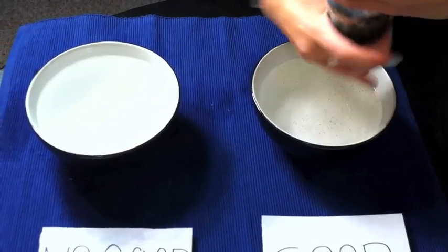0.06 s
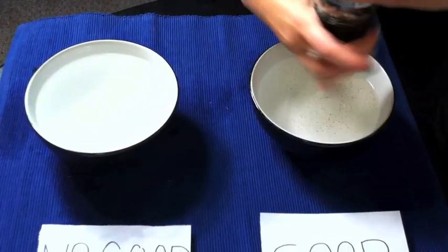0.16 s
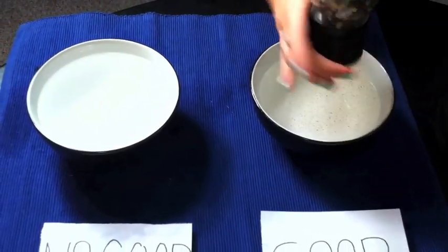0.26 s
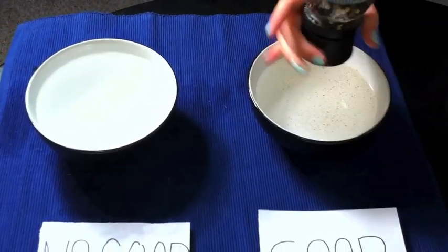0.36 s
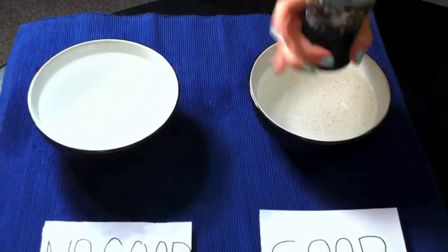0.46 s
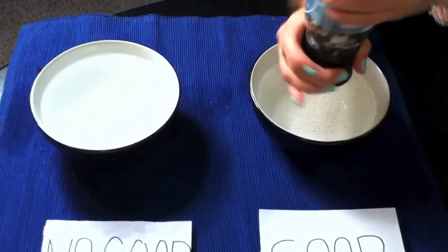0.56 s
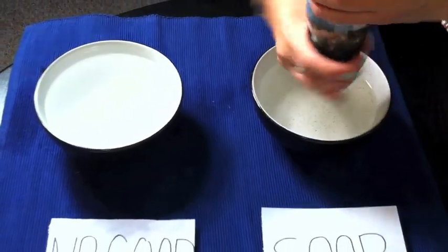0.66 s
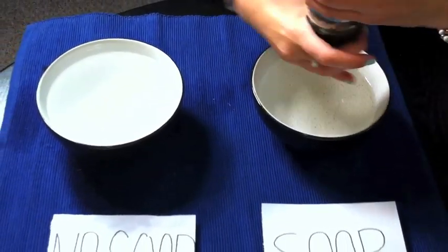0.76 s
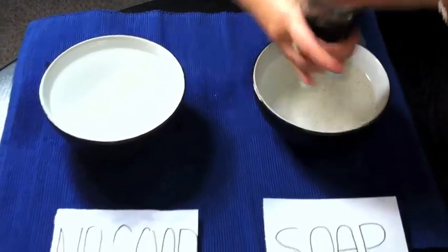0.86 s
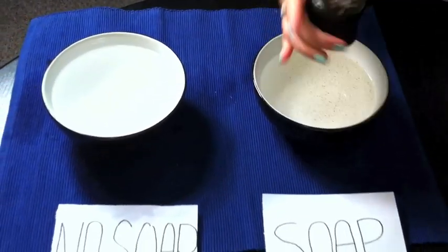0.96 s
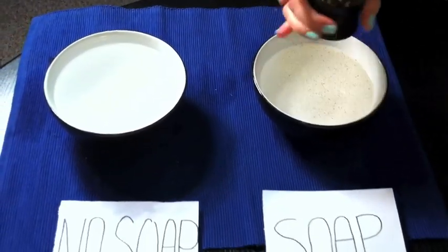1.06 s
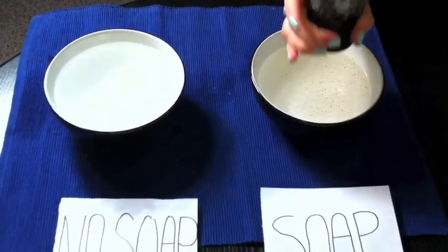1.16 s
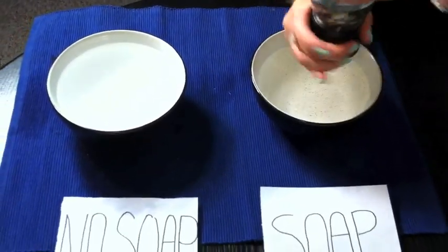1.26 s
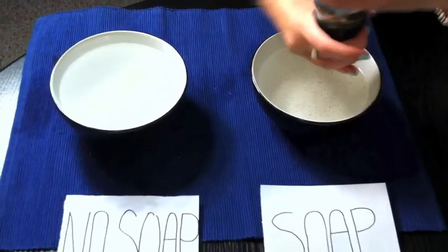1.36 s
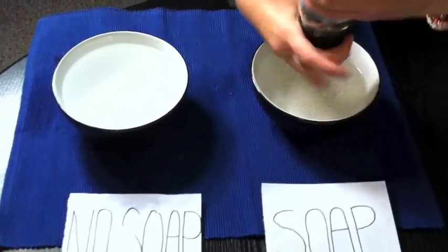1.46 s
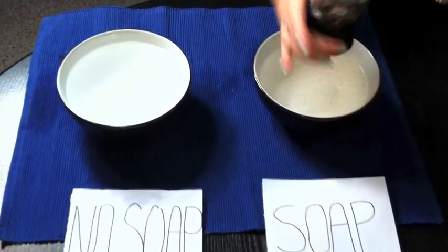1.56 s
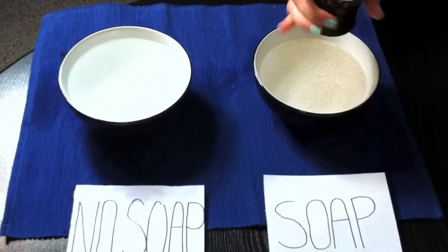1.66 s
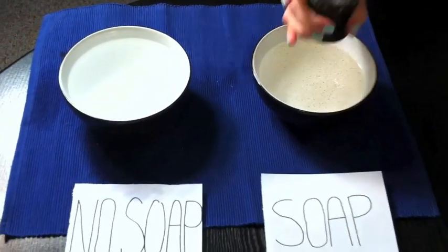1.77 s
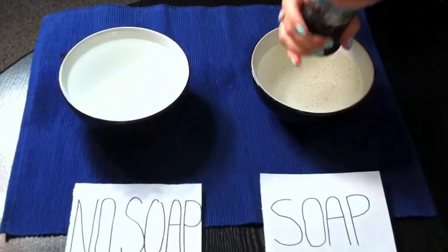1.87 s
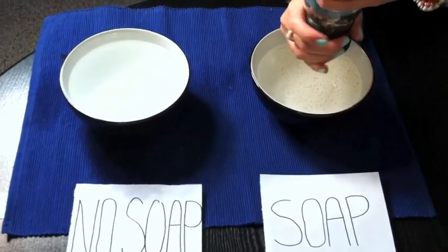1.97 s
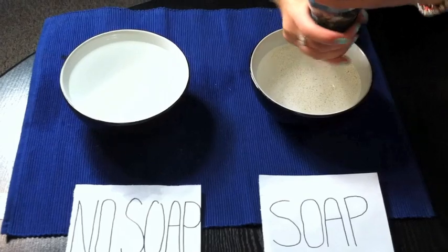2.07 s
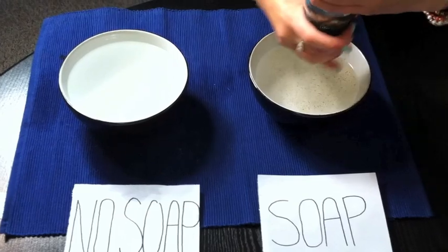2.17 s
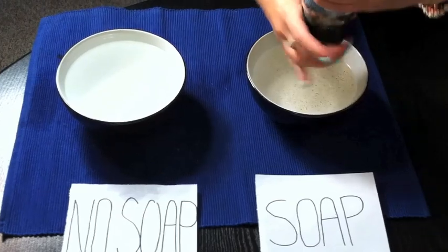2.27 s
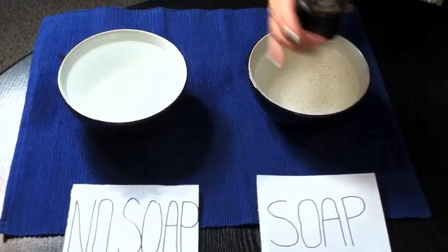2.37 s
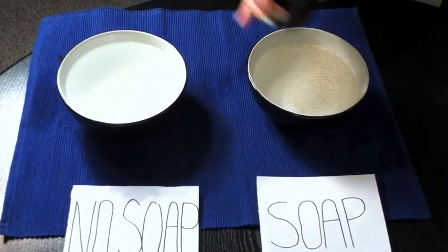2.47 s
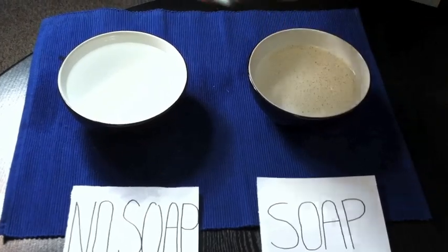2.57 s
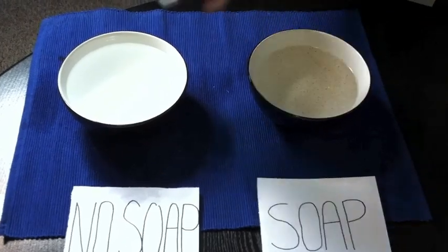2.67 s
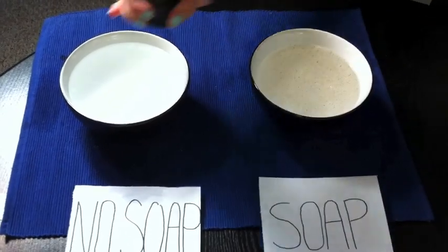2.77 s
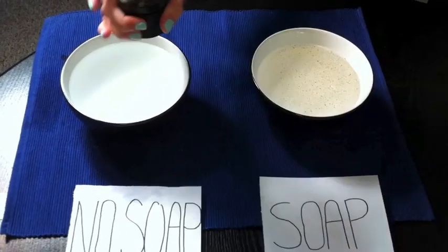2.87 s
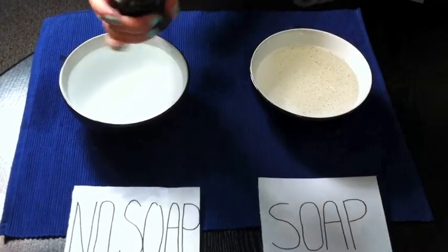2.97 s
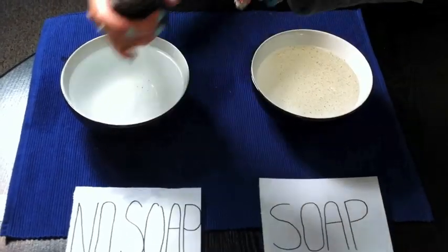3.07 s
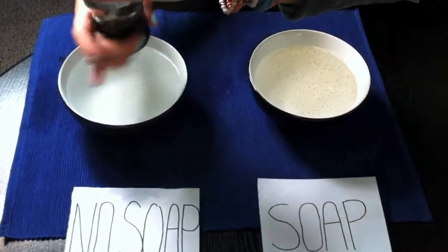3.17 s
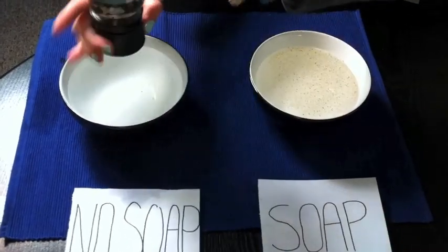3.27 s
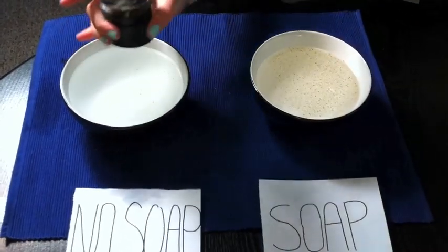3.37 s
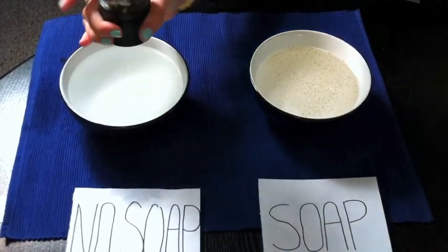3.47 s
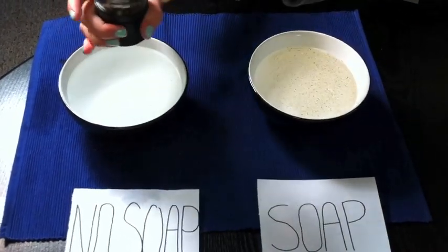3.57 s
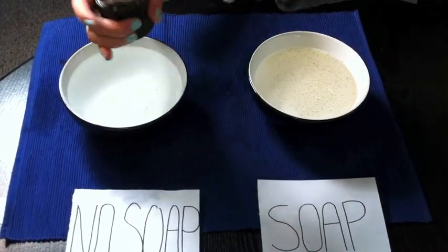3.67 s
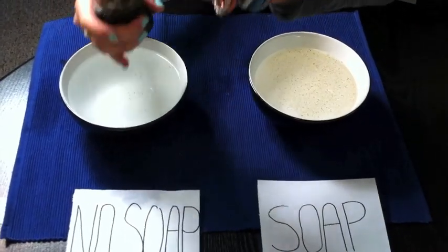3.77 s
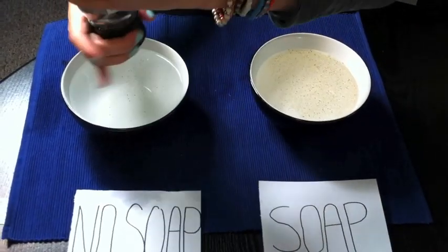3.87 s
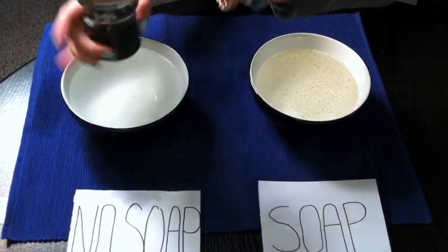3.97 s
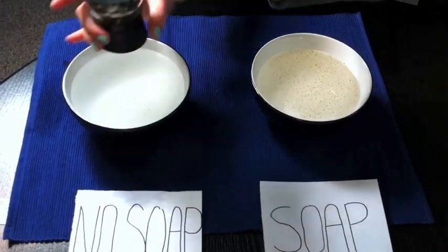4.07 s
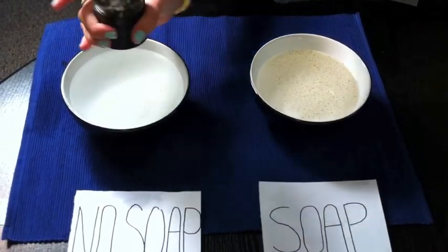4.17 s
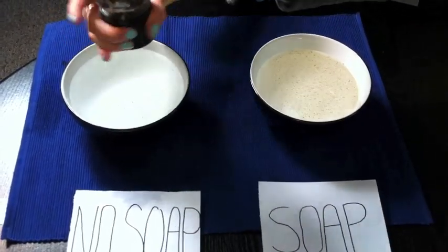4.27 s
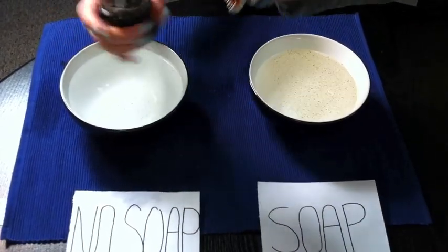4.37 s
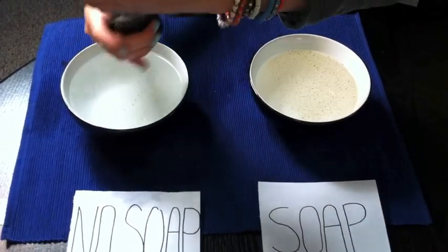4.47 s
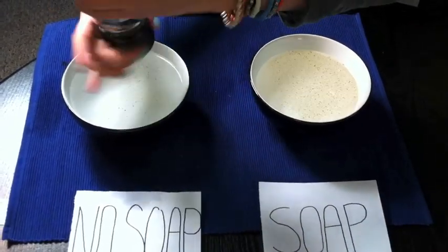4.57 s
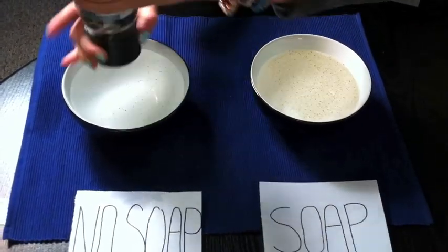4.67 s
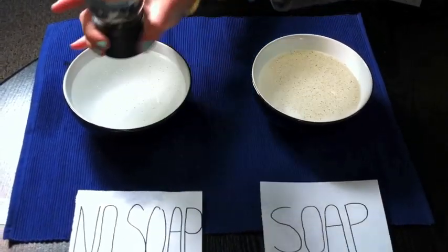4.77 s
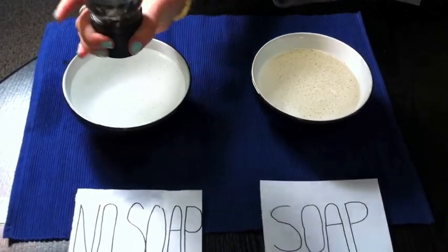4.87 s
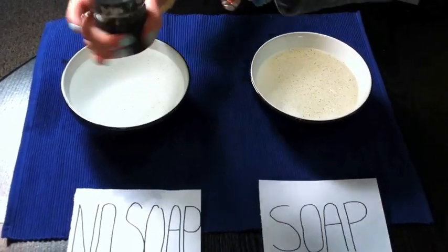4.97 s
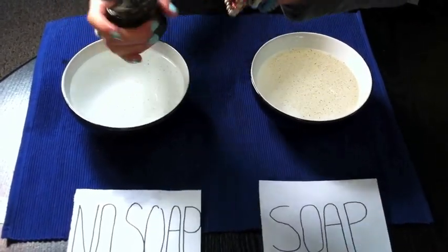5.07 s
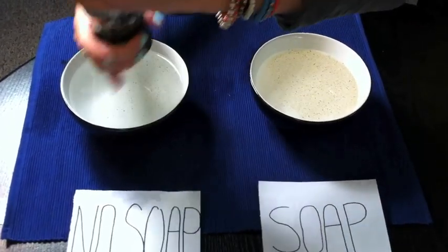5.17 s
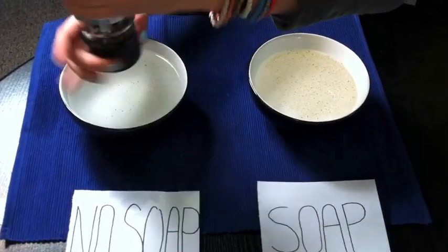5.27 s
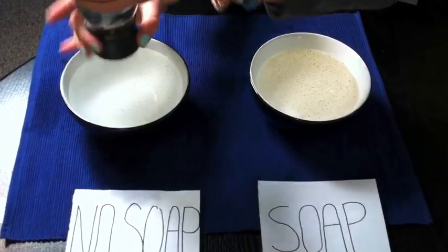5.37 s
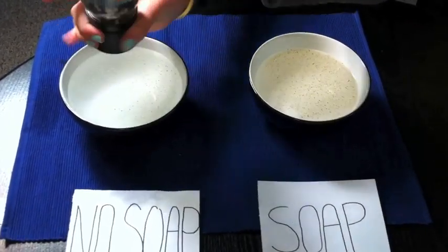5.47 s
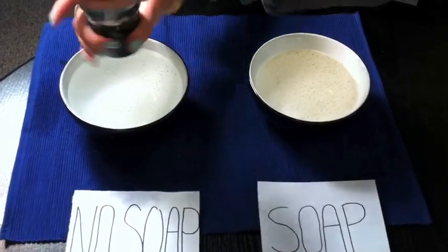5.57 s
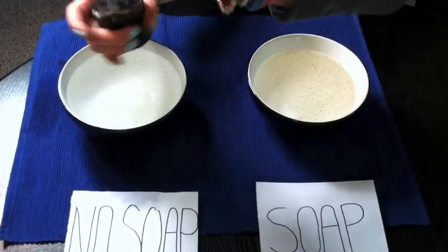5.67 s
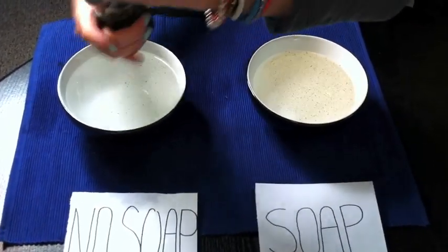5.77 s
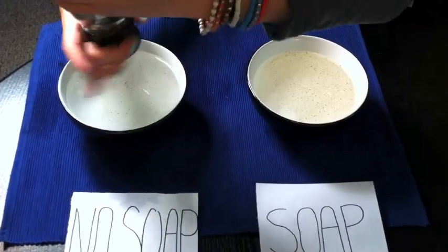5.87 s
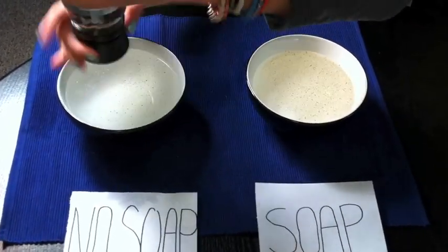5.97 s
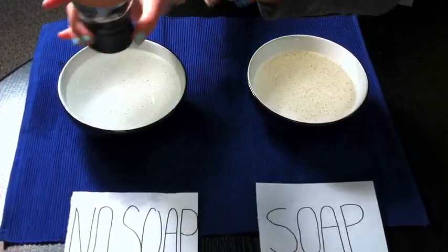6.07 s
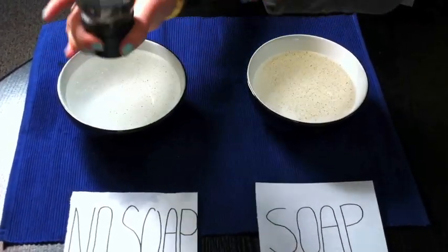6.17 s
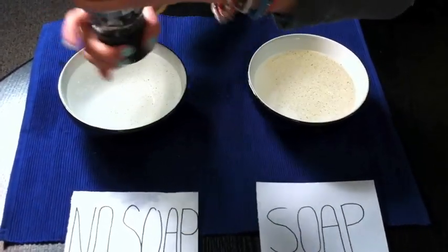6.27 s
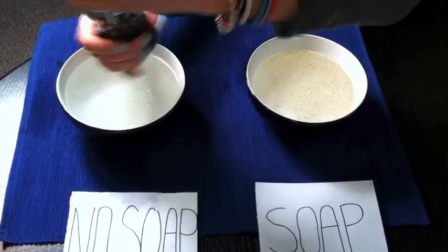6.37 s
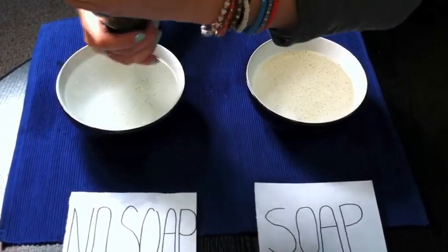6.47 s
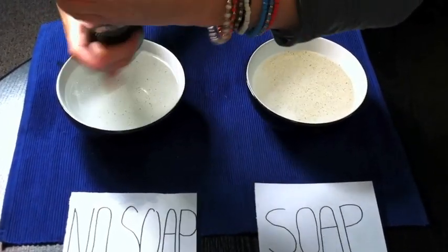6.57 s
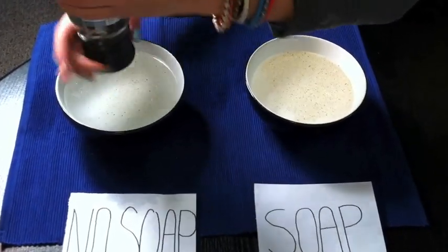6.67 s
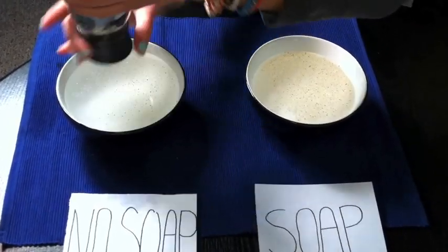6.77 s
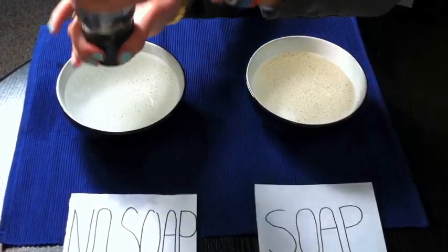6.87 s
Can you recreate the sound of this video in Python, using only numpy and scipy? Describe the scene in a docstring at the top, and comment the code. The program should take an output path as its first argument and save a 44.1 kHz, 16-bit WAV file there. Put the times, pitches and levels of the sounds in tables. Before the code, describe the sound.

A hand pepper mill grinds in short raspy twists, peppercorns cracking sharply, loose parts knocking between strokes, in a small room with a faint hum.

```python
"""Hand pepper mill in a small room

A hand pepper mill is twisted in ten short strokes over bowls on a cloth-covered table.
In each stroke the burr rasps through grit, as grains and fragments striking its resonances,
and peppercorns crack as millisecond noise bursts; between strokes the hand shifts its grip
and loose parts knock. A small room rings after every crack, and an appliance hums faintly."""
import sys
import numpy as np
from scipy import signal
from scipy.fft import rfft, irfft, next_fast_len
from scipy.io import wavfile

SR = 44100
rng = np.random.default_rng(int(sys.argv[2]) if len(sys.argv) > 2 else 0)


def digitize_waveform(pressure):
    """Quantize a signal to 16-bit integers and store it at the path in sys.argv[1].

    Rows of a 2-D input are taken as channels; values are limited to [-1, 1].
    """
    field = np.atleast_2d(pressure).T
    bounded = np.clip(field, -1, 1)
    quanta = np.round(bounded * 32767).astype(np.int16)
    wavfile.write(sys.argv[1], SR, quanta)


N = 305613
TIME = np.arange(N) / SR

# twists of the hand, two of them with a short pause midway, so two rows each; level ahead of source gains:
# start_s, length_s, rasp_level_db, load_take_up_s
STROKES = [(-.02, 0.12, -38, 0.0098), (0.546, 0.1, -44.5, 0.027), (0.668, 0.086, -39.5, 0.035),
           (1.199, 0.18, -37.5, 0.062), (1.966, 0.17, -45, 0.025), (2.798, 0.28, -45.5, .13),
           (3.562, 0.23, -42.5, 0.081), (4.232, 0.25, -47, 0.024), (4.909, 0.19, -42.5, 0.055),
           (5.603, 0.21, -43, 0.035), (6.227, 0.099, -41.5, .03), (6.428, 0.1, -47, 0.028)]
LET_GO_S = 0.025  # decay time of the force after a twist
# resonances of the burr and its housing: centre_hz, width_hz, lift_db
MILL_MODES = [(1548, 280, 8), (2150, 140, 5.5), (2500, 190, 4.5), (2950, 59, 9), (5440, 170, 7.5),
              (6200, 460, 4.5), (8090, 510, 4)]
# resonances of the loose parts: centre_hz, width_hz, lift_db
LOOSE_MODES = [(1080, 100, 5), (1531, 160, 5.5), (2244, 230, 4.5), (3064, 230, 8), (5840, 420, 2),
               (7350, 160, 4), (14000, 900, 8.5)]
# relative spectrum of loose parts in contact: frequency_hz, density_db_per_hz
KNOCK_COLOUR = [(40, -16), (300, -9), (800, -2.5), (1150, 4), (1900, 4.5), (2900, -0.5), (3700, -10.5),
                (4700, -9), (6000, 0.5), (8500, -4.5), (10500, -11), (14500, -14)]
# relative spectrum of the rasping teeth: frequency_hz, density_db_per_hz
RASP_COLOUR = [(40, -23), (300, -19.5), (800, -16), (1150, -12), (1800, -6.5), (2700, -3.5), (3700, -3.5),
               (5600, -4.5), (8000, -8), (10500, -11), (13000, -8.5), (15500, -16.5)]


def from_db(db):
    """Amplitude ratio of a level in dB."""
    return 10 ** (np.asarray(db) / 20)


def rms_one(x):
    """Scales a signal to an rms of one."""
    return x / np.sqrt(np.mean(x ** 2) + 1e-20)


def at_hz(points, hz):
    """Reads a table on a log-frequency axis."""
    known_hz, values = np.transpose(points)
    return np.interp(np.log(np.maximum(hz, 1)), np.log(known_hz), values)


def drift(knots_per_s):
    """Slow chance: random knots with a spread of one, joined by straight lines."""
    knots = rng.standard_normal(N // 20)
    return np.interp(TIME * knots_per_s, np.arange(len(knots)), knots)


def shape(x, curve):
    """Causal (minimum-phase) filter whose gain in dB is curve(Hz)."""
    size = 2 * next_fast_len(len(x))
    cepstrum = irfft(np.log(from_db(curve(np.fft.rfftfreq(size, 1 / SR)))))
    # folding the cepstrum onto positive time makes the phase minimal
    cepstrum[1:size // 2] *= 2
    cepstrum[size // 2 + 1:] = 0
    response = np.exp(rfft(cepstrum))
    return irfft(rfft(x, size) * response)[:len(x)]


def coloured_noise(colour):
    """Steady noise with the spectrum of a table, rms 1."""
    return rms_one(shape(rng.standard_normal(N), lambda hz: at_hz(colour, hz)))


def swells(rows):
    """A smooth rise and fall for each row of centre_s, length_s, peak level in dB."""
    return sum(from_db(db) * np.exp(-(2 * (TIME - centre) / length) ** 2) for centre, length, db in rows)


def body_db(colour, modes, hz):
    """A contact's own spectrum, lifted at the resonances of the part it strikes."""
    lift = 0
    for centre, width, db in modes:
        lift = lift + (from_db(db) ** 2 - 1) / (1 + (2 * (hz - centre) / width) ** 2)
    return at_hz(colour, hz) + 10 * np.log10(1 + lift)


def snaps(table, colour, modes, rise_s, gain_db, uneven_db, ring_db, ring_width, size=2048):
    """Each snap is a burst of tiny fractures or contacts that dies within milliseconds and rings its part."""
    out = np.zeros(N + size)
    t = np.arange(size) / SR
    chance = rng.standard_normal((len(table), 2, size))
    for (s, level_db, bass_db, treble_db, decay_s, ring_hz), (noise, sizes) in zip(table, chance):
        envelope = (1 - np.exp(-t / rise_s)) * np.exp(-t / decay_s)
        burst = noise * from_db(uneven_db * np.tanh(sizes)) * envelope
        tilt = [(400, 0), (1000, bass_db), (1800, bass_db), (2800, 0), (5500, 0), (10000, treble_db)]
        # the place of contact decides which resonance answers most
        struck = list(modes) + [(ring_hz, ring_width, ring_db)]
        snap = shape(burst, lambda hz: body_db(colour, struck, hz) + at_hz(tilt, hz))
        start = int(s * SR)
        out[start:start + size] += from_db(level_db + gain_db) * rms_one(snap)
    return out[:N]


def grit(colour, modes, per_s, spread_db, clump_db, clump_rate, tilt_db=0):
    """Tiny grains strike the mill in clumps; tilt is in dB per octave above 1 kHz; rms 1."""
    sizes = from_db(spread_db * np.minimum(rng.exponential(1, N), 3))
    signs = rng.choice([-1, 1], N)
    strikes = rng.random(N) < per_s / SR
    clumps = from_db(clump_db * np.tanh(drift(clump_rate)))
    grains = sizes * signs * strikes * clumps

    def curve(hz):
        octaves = np.log2(np.maximum(hz, 1000) / 1000)
        return body_db(colour, modes, hz) + tilt_db * octaves

    return rms_one(shape(grains, curve))


def background():
    """An appliance hum, wavering slightly in pitch and level, over the hush of the room."""
    # partials of the hum, level before its slow drift: pitch_hz, rms_level_db
    hum_partials = [(169.4, -68.5), (338.8, -71.5), (509, -80)]
    # relative spectrum of the room's hush: frequency_hz, density_db_per_hz
    air_colour = [(25, -17), (75, -24), (125, -8), (190, -0.5), (240, -2.5), (360, -3.5), (450, -10.5),
                  (600, -13), (1050, -18), (1330, -14.5), (1900, -19), (3500, -21.5), (6000, -22),
                  (16000, -27)]
    phase = 2 * np.pi * np.cumsum(1 + 0.0015 * drift(4)) / SR  # of 1 Hz
    tones = 0
    for hz, db in hum_partials:
        tones = tones + from_db(db + 0.8 * drift(5)) * np.sqrt(2) * np.sin(hz * phase)
    return tones + from_db(-64) * coloured_noise(air_colour)


def room(x, tail_db, early_db, early_t60, build_s, size=32768):
    """A quick scatter from the table and bowls, then a diffuse tail whose decay depends on frequency."""
    # room decay: frequency_hz, t60_s
    decay_times = [(150, 0.23), (700, 0.6), (2000, 0.35), (6000, 0.3), (10000, 0.21), (16000, 0.09)]
    t = np.arange(size) / SR
    hz = np.fft.rfftfreq(size, 1 / SR)
    white = rfft(rng.standard_normal(size))
    centres = [row[0] for row in decay_times]
    tail = 0
    # overlapping bands, each with its own decay
    for (_, t60), share in zip(decay_times, np.eye(len(decay_times))):
        band = irfft(white * at_hz(list(zip(centres, share)), hz))
        tail = tail + band * from_db(-60 * t / t60)
    early = rng.standard_normal(size) * from_db(-60 * t / early_t60)
    build = 1 - np.exp(-(t / build_s) ** 2)
    response = from_db(tail_db) * rms_one(tail * build) + from_db(early_db) * rms_one(early * build)
    return x + signal.fftconvolve(x, response / np.sqrt(size))[:N]


def hand():
    """Soft swells of dull friction noise from the hand between strokes."""
    # soft rustles: centre_s, length_s, level_db
    rustle_rows = [(1.486, 0.055, -60.5), (3.174, 0.018, -51.5), (3.215, 0.076, -64), (3.496, 0.079, -55)]
    # relative spectrum of the rustle: frequency_hz, density_db_per_hz
    rustle_colour = [(100, -19.5), (400, -1.5), (750, 1.5), (1400, -3.5), (2500, -10.5), (5000, -20),
                     (15000, -44.5)]
    return swells(rustle_rows) * coloured_noise(rustle_colour)


def rattle():
    """Loose corns and parts tick softly as the hand shifts its grip and jiggles the contents."""
    # shifts of the grip: centre_s, length_s, level_db
    regrip_rows = [(.3, 0.98, -66.5), (1.03, 0.22, -60.5), (1.7, 0.77, -67.5), (3.27, 0.33, -65.5),
                   (4.06, 0.29, -61.5), (4.72, 0.27, -59.5), (5.38, 0.26, -64), (6.06, 0.43, -61),
                   (6.68, 0.24, -69)]
    ticks = grit(KNOCK_COLOUR, LOOSE_MODES, per_s=1000, spread_db=4.5, clump_db=7.5, clump_rate=120)
    return swells(regrip_rows) * ticks


def knocks():
    """Loose parts knock as the grip shifts; a soft contact trades treble for bass."""
    # knocks, level ahead of the gain below: start_s, level_db, brightness_db, chatter_decay_s, resonance_hz
    knock_rows = [(.2562, -57.5, 6, 0.0034, 2400), (.418, -50.5, 2, .008, 1440),
                  (.9262, -51.5, 0, 0.008, 2120), (1.0082, -40, 0, 0.0094, 2260),
                  (1.022, -42, -1, 0.0086, 1750), (1.0821, -45, 2, .007, 2030),
                  (1.6548, -39, -11, 0.007, 1440), (1.6637, -38, 8.5, 0.00086, 2380),
                  (1.709, -45.5, -1, .006, 1430), (1.7786, -39, -14.5, 0.0015, 1420),
                  (2.5038, -57, -13, 0.0018, 1340), (3.3268, -41.5, 3, 0.004, 1500),
                  (4.03, -51, -7, .002, 1125), (4.0714, -43, 3, 0.0032, 1740),
                  (4.7062, -41, -3, 0.0012, 1310), (4.725, -45.5, 2, .002, 1460),
                  (5.1933, -47.5, -12, 0.00075, 1660), (5.2891, -49.5, 0, 0.0041, 1670),
                  (5.3775, -43, -3.5, 0.0033, 1830), (5.3988, -47, 2.5, 0.0024, 1520),
                  (5.5066, -54, -23, 0.001, 1210), (6.0388, -51.5, -55, 0.00081, 1430),
                  (6.0635, -45, 1.5, 0.0023, 2090), (6.095, -50, 5.5, 0.0021, 2000),
                  (6.1436, -50, -24.5, .001, 1190), (6.1668, -40.5, -15, .001, 1358),
                  (6.6577, -43, -3, 0.0027, 1480), (6.8322, -40, 1.5, 0.0014, 2980)]
    # each dB of brightness costs 0.72 dB of bass
    rows = [(s, db, -0.72 * bright, bright, decay, hz) for s, db, bright, decay, hz in knock_rows]
    return snaps(rows, KNOCK_COLOUR, LOOSE_MODES, rise_s=0.0017, gain_db=-10.5,
                 uneven_db=6.0, ring_db=10.5, ring_width=170)


def jolts(gain_db):
    """The burr lurches free on a hard crack and the housing gives a short dull knock."""
    # cracks hard enough to jolt the whole mill in the hand, level ahead of the gain: start_s, level_db
    jolt_rows = [(1.962, -29), (2.996, -49), (4.379, -49), (4.413, -60), (5.619, -47), (6.408, -56)]
    # response of the housing: frequency_hz, gain_db
    jolt_colour = [(30, -19), (100, -16), (220, -1.5), (420, -24), (650, -8), (850, -6.5), (1120, 9.5),
                   (1600, -9), (3000, -30.5), (15000, -45)]
    pushes = np.zeros(N)
    for s, level_db in jolt_rows:
        pushes[int(s * SR)] = from_db(level_db + gain_db)
    return shape(pushes, lambda hz: at_hz(jolt_colour, hz))


def scrapes():
    """With no corn between them the teeth chatter on each other and ring the burr."""
    # scrapes of the teeth: centre_s, length_s, level_db
    scrape_rows = [(.612, 0.025, -61), (4.309, 0.015, -33), (6.265, 0.016, -33)]
    # ring of the burr: centre_hz, width_hz, lift_db
    burr_ring = [(3000, 150, 23)]
    chatter = grit(RASP_COLOUR, burr_ring, per_s=2600, spread_db=0, clump_db=17.0, clump_rate=320)
    return swells(scrape_rows) * chatter


def twist(t, start, length, grip_s):
    """Force of one twist, 0 to 1: it takes up the load, holds and dies away."""
    take_up = np.clip((t - start) / grip_s, 0, 1) ** 2
    return take_up * np.exp(-np.maximum(t - start - length, 0) / LET_GO_S)


def crumbs(spread_db, tilt_db, decay_s, count=64):
    """Small fragments break all through a stroke, each on a resonance drawn from the mill's."""
    fragments_per_s = 100
    rows = []
    for (start, length, stroke_db, grip_s), draws in zip(STROKES, rng.random((len(STROKES), count, 5))):
        for k, (when, size, bass, treble, mode) in enumerate(draws):
            s = start + (k + when) / fragments_per_s
            if 0 < s < start + length + 2 * LET_GO_S:
                force_db = 20 * np.log10(twist(s, start, length, grip_s) + 1e-9)
                level_db = stroke_db + force_db + spread_db * (2 * size - 1)
                bass_db, treble_db = tilt_db * (2 * bass - 1), tilt_db * (2 * treble - 1)
                ring_hz = MILL_MODES[int(mode * len(MILL_MODES))][0]
                rows.append((s, level_db, bass_db, treble_db, decay_s, ring_hz))
    return rows


def burr():
    """The burr rasps only while the hand twists: coarse fragments crunch, fine powder hisses."""
    force = sum(from_db(db) * twist(TIME, start, length, grip_s) for start, length, db, grip_s in STROKES)
    fragments = crumbs(spread_db=6.0, tilt_db=8.0, decay_s=0.0017)
    coarse = snaps(fragments, RASP_COLOUR, MILL_MODES, rise_s=0.0005, gain_db=-14.5,
                   uneven_db=8.5, ring_db=10.5, ring_width=370)
    fine = grit(RASP_COLOUR, MILL_MODES, per_s=3500, spread_db=2.5, clump_db=6.0, clump_rate=260, tilt_db=0.5)
    return coarse + force * from_db(-8.0) * fine


def cracks():
    """Whole corns break between the teeth and ring the burr."""
    # peppercorns cracking, level ahead of the gain below; bass acts about 1 to 1.8 kHz, treble fully from 10 kHz:
    # start_s, level_db, bass_db, treble_db, crumbling_decay_s, strongest_resonance_hz
    crack_rows = [(.0037, -37.5, 1, 2, 0.0017, 3020), (.06, -33, 5.5, -2, 0.0025, 1630),
                  (0.0691, -42, 17, -7, 0.0028, 2900), (0.162, -38, -1.5, -1, 0.001, 2310),
                  (0.5838, -37, 8, 6, 0.009, 3000), (0.5969, -30.5, 6.5, 1, 0.0013, 5260),
                  (0.6202, -34.5, -31, -4, 0.001, 2940), (.655, -40.5, -1, 6, .005, 5340),
                  (0.7463, -34, 3, 6, 0.0077, 5500), (.7628, -30.5, -6, -18, 0.0018, 3000),
                  (0.7929, -40, -0.5, 4, 0.0034, 1580), (1.25, -42, 3, 10, .0015, 4830),
                  (1.2631, -32.5, -6, 0, .0036, 5570), (1.2902, -46, 17, -6, .0046, 5460),
                  (1.366, -39.5, 10, 8, 0.0063, 2920), (1.4178, -47.5, -1.5, 4, .003, 5400),
                  (1.96, -15, 6.5, 1.5, 0.002, 2237), (1.9665, -24, 10.5, 14, 0.0093, 1400),
                  (2.0464, -30, -9, 5.5, 0.0043, 2966), (2.824, -51, -3, 10, .0015, 5400),
                  (2.8472, -45, -13, 3, 0.0023, 2920), (2.8548, -43.5, -1, 0, 0.0013, 2150),
                  (2.8858, -42.5, 0, 7, 0.0013, 2860), (2.925, -38.5, -9, 11, 0.0016, 2150),
                  (2.934, -41, -14, 8, .0015, 6440), (2.9958, -19.5, -6, 10, 0.0014, 1600),
                  (3.571, -43.5, 2, 12, .004, 3070), (3.588, -34.5, -1, 4.5, 0.0038, 3020),
                  (3.6386, -38, -5, -12, .003, 2950), (3.672, -34.5, -6, 5, 0.0018, 6350),
                  (4.2557, -39, -1, 8, 0.0011, 3010), (4.2797, -36, -9, 5, 0.0055, 3000),
                  (4.3037, -33.5, -0.5, 3, 0.0011, 2850), (4.3119, -33, -25, 10, 0.0014, 2970),
                  (4.3444, -30.5, 8, -10, 0.0028, 1600), (4.3743, -30, 0, 15, 0.0025, 2940),
                  (4.3771, -22, 2, 3, 0.0022, 2900), (4.4117, -19, -1, 5, 0.0038, 1570),
                  (4.9286, -38.5, -6, 5, 0.0022, 3060), (5.0212, -32, -4.5, 3, 0.0073, 2150),
                  (5.0587, -36, 8, 2, 0.0029, 2920), (5.0903, -38, -10, 1.5, 0.0022, 2810),
                  (5.6084, -31.5, -4.5, 9, .0013, 3900), (5.6189, -18, -0.5, 5.5, 0.0033, 3100),
                  (5.7056, -27.5, 7.5, 5.5, 0.0014, 2950), (5.7625, -24.5, -0.5, 1, 0.0014, 2950),
                  (6.2443, -48, 1, 7, .0026, 3163), (6.2558, -38, -3, 15, 0.0041, 3060),
                  (6.262, -42, -2, -15, .002, 2940), (6.2765, -29.5, -9, 4.5, 0.00072, 3150),
                  (6.3196, -30.5, 1, 7.5, 0.0017, 2580), (6.351, -33.5, -1, 3, 0.0048, 3020),
                  (6.4077, -17.5, 1, 6.5, 0.0023, 2600), (6.485, -37, -3, 15, 0.0016, 2930)]
    # relative spectrum of a crack: frequency_hz, density_db_per_hz
    crack_colour = [(40, -32.5), (150, -17), (450, -17), (850, -10), (1300, -2.5), (2000, 0), (3400, 2),
                    (4600, -1), (5900, 0.5), (9000, -7.5), (13000, -9), (15500, -11.5)]
    return snaps(crack_rows, crack_colour, MILL_MODES, rise_s=0.00032, gain_db=-9.0,
                 uneven_db=7.5, ring_db=13.5, ring_width=165)


def scene():
    """The mill sits somewhere else for every row of STROKES, so the room answers each one differently."""
    mill = cracks() + jolts(gain_db=34.5) + knocks() + burr() + scrapes() + rattle() + hand()
    place = np.searchsorted([stroke[0] for stroke in STROKES], TIME)
    heard = 0
    for k in np.unique(place):
        heard = heard + room(mill * (place == k), tail_db=-10.0, early_db=-8.0, early_t60=0.093, build_s=0.0022)
    return (heard + background())[None]


def record(dry):
    """The single microphone channel is cut steeply above 15.9 kHz by an elliptic low-pass."""
    low_pass = signal.ellip(12, 0.1, 80, 15900, fs=SR, output="sos")
    return signal.sosfilt(low_pass, dry)


dry = scene()
out = record(dry)
digitize_waveform(out)
```